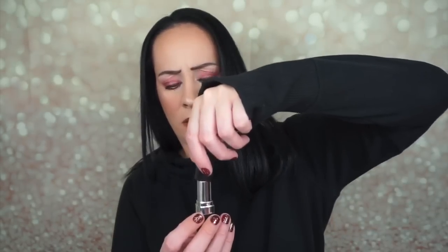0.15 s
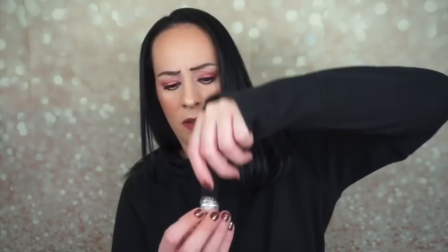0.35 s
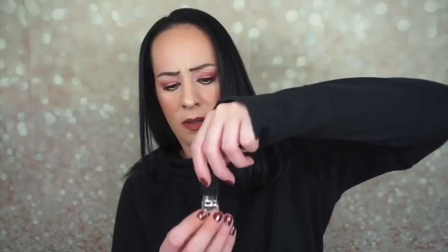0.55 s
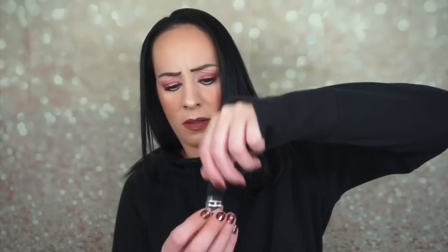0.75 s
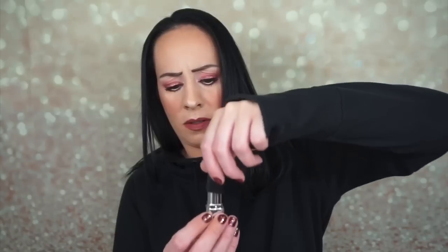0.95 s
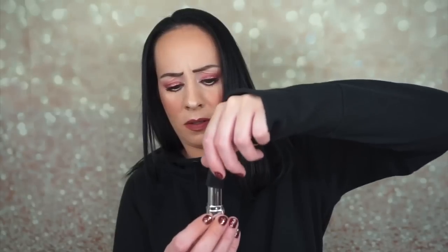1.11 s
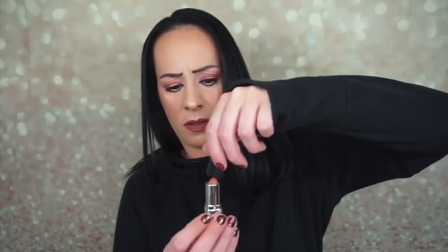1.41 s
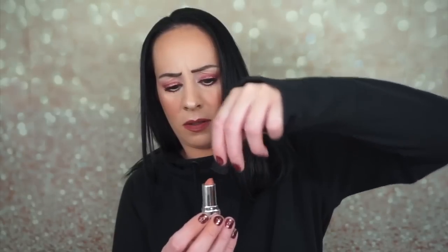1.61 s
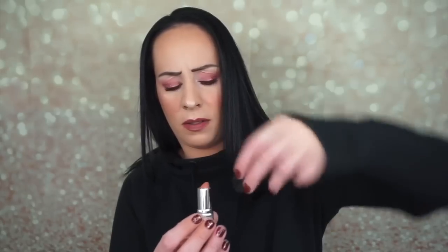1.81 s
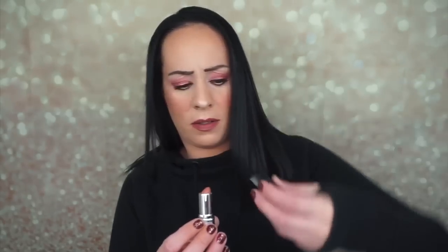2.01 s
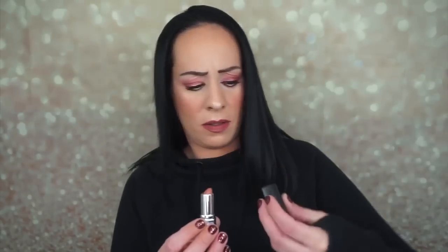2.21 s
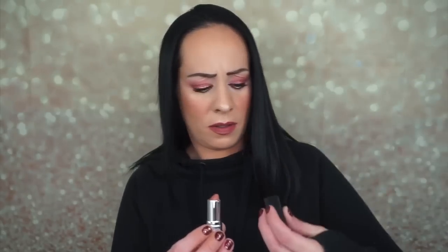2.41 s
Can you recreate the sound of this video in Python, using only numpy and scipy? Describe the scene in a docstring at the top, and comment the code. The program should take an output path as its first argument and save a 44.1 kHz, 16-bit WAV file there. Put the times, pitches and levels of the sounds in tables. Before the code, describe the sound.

Close up in a small room, a cap ticks and scrapes along a metal lipstick tube, then snaps free with a very short ring. It grazes the tube once more, leaving soft rustling and a quiet room hum.

```python
"""The cap of a metal lipstick tube is worked off by fingers, close by in a small room.
It sticks and slips along the sleeve in dry ticks, knocks hollowly, snaps free with a short
metallic ring and grazes the tube once more. Each contact is a bright crack plus a few fading tones.
Hands and clothing rustle faintly over the low hum of the room."""
import sys
import numpy as np
from scipy import signal
from scipy.fft import rfft, irfft
from scipy.io import wavfile

SR = 44100
rng = np.random.default_rng(int(sys.argv[2]) if len(sys.argv) > 2 else 0)


def transcribe(u):
    """Save the signal u as a 16-bit wav file named by the first command-line argument.

    u: samples, shape (n,) or (channels, n), limited to [-1, 1]; the rate is SR.
    q: integer samples, one column per channel.
    """
    v = np.clip(np.atleast_2d(u).T, -1, 1)
    q = np.round(v * 32767).astype(np.int16)
    wavfile.write(sys.argv[1], SR, q)


N = 112454
TIME = np.arange(N) / SR
RING_TIME = TIME[:8192]

# steady air of the room: f/Hz, level/dB
AIR_SPECTRUM = [(12, -13.5), (22, -10.5), (36, 1), (60, -10.5), (100, -14.5), (135, -7.5), (180, -11.5),
                (260, -10.5), (295, -17.5), (345, -12.5), (415, -10.5), (455, -22.5), (520, -22),
                (650, -27), (1000, -25), (2300, -34), (5000, -37.5), (11000, -38)]
# hums of the room: f/Hz, half width/Hz, level/dB
ROOM_HUMS = [(134, 17.4, -66.5), (366.6, 6.5, -59), (421.7, 9.5, -69), (485, 4.3, -72)]
# how alike the noise is in both ears: f/Hz, likeness (1 = the same)
EAR_LIKENESS = [(30, 1), (90, 0.98), (180, 0.89), (350, 0.84), (700, 0.25), (2000, 0.15), (10000, 0.12)]
# hand and clothing move: t/s, level/dB
RUSTLE_LEVELS = [(0, -54.5), (.08, -56), (.19, -57), (.34, -48), (.43, -54), (.7, -55), (1.15, -69),
                 (1.45, -63), (1.75, -65.5), (2.06, -63.5), (2.17, -72.5), (2.55, -62)]
# colour of the rustle: f/Hz, level/dB
RUSTLE_COLOUR = [(100, -13.5), (300, -3), (480, 6), (700, -3.5), (1200, -12), (2000, -19), (4000, -27.5),
                 (11000, -44.5)]
# soft bumps of the arm: t/s, level/dB, half length/s
ARM_BUMPS = [(0.129, -47.5, .06), (0.47, -55.5, 0.14), (2.264, -49.5, 0.049), (2.388, -53, 0.086)]
# colour of the bumps: f/Hz, level/dB
BUMP_COLOUR = [(20, 5), (36, 5), (70, -2), (135, -1.5), (250, -10.5), (600, -52.5)]
# the cap knocks on the tube: t/s, level/dB, crack level/dB, rasp length/s
CAP_KNOCKS = [(0.057, -36.5, -16, 0.012), (0.629, -12.5, -11.5, 0.0011), (0.7415, -3.5, -5.5, .004)]
# tones of the hollow cap: f/Hz, level/dB, t60/s (the time to fade by 60 dB)
CAP_TONES = [(717, -5.5, 0.024), (820, -7.5, .012), (1085, -12, 0.0096), (1574, -12, 0.026),
             (1942, -2.5, 0.013), (2160, -4, .011), (2460, -9, 0.0095), (2850, -7, 0.0086),
             (3620, -12.5, 0.0091)]
# the cap rubs along the sleeve: t/s, level/dB
RUB_LEVELS = [(0, -93), (.2, -67), (.27, -63), (.34, -58), (.39, -62), (.56, -62), (.67, -49), (.73, -54.5),
              (.79, -43.5), (.85, -56), (.95, -72)]
# colour of the rubbing: f/Hz, level/dB
RUB_COLOUR = [(500, -22.5), (2200, -6), (2900, -10.5), (4800, -6.5), (7000, -5), (8800, -4), (11000, -9)]
# the cap slips: t/s, level/dB, body boost/dB, mid boost/dB, top boost/dB, rasp length/s, pitch factor
SLIP_TICKS = [(0.149, -53.5, -8, -9, 9, .001, 0.95), (0.2212, -23.5, 7, 0.5, 7, .002, 1.01),
              (0.2753, -35.5, -24, 1, 8, .003, 1.11), (.3080, -27.5, 1, 2, 7.5, 0.0013, 1),
              (0.3357, -27.5, 1, 2.5, 3.5, 0.00072, 1.15), (0.3487, -24.5, 2, -8, -1.5, 0.00097, 1.01),
              (0.3725, -29, 4, 0, 3, .002, 1.14), (0.3922, -29.5, 6, 3, -5, .001, 0.97),
              (0.44, -19.5, -1, -4, -2, 0.0017, 0.99), (0.443, -21, 5.5, -3.5, 0.5, .003, 1.015),
              (0.4778, -29.5, -7, -5, 0.5, 0.0009, 1.02), (0.5262, -20, 3, 7.5, 2, 0.0014, 1.04),
              (0.5948, -23.5, 6, -5, -0.5, 0.0011, 1), (0.605, -31.5, 10, -14, 4.5, .003, 0.82),
              (0.6304, -31, -7, -5, 2, 0.0014, 1.05), (0.656, -22.5, 2, -6, -9, 0.0035, 1.01),
              (0.6733, -33, 3, -2, 2, 0.0021, 1), (0.68, -45, 4, -6, 8.5, 0.0022, 1),
              (0.7036, -24.5, 11, -5, 5.5, .002, 1.03), (0.8023, -36.5, 24, 4, 13, .003, 1.07),
              (.8059, -14.5, 9.5, -18, 0.5, 0.00202, 1.026), (0.8387, -39, -8, 8.5, 9.5, 0.0011, 0.99),
              (.9062, -68, 4.5, 4, 3, .002, 1), (1.0100, -41, 11, 7.5, 2, .004, 1.03)]
# tones of the held sleeve, before each tick shifts them: f/Hz, level/dB, t60/s
SLEEVE_TONES = [(990, -15.5, 0.0083), (1740, -15, 0.0058), (2848, -6, 0.021), (3130, -7, 0.018),
                (3790, -9.5, 0.0063), (4620, -10.5, 0.024), (5700, -33, 0.0069), (6360, -3, 0.03),
                (7040, -4, 0.042), (7575, -1, 0.0085), (7800, -19, 0.0063), (9270, -7, 0.0027),
                (10160, 5.5, 0.0034), (10700, 4, 0.013)]
# the cap snaps free: t/s, level/dB, rasp length/s
RELEASE_SNAPS = [(0.7469, -12.5, 0.0016), (0.7502, -5, 0.0012), (0.76, -19.5, 0.0015)]
# tones of the freed tube: f/Hz, level/dB, t60/s
TUBE_TONES = [(3176, -8, 0.032), (3608, -6, 0.031), (4020, -10.5, .03), (4570, -21, 0.049),
              (6890, 4.5, 0.033), (7120, 1, .04), (7480, -3.5, 0.0187), (8450, -4.5, 0.014),
              (8750, -11.5, 0.011), (9500, -6, 0.016), (10100, -25, .022)]
# echoes off nearby surfaces: delay/s, left level/dB, right level/dB
CLOSE_ECHOES = [(.0021, -10.5, -13.5), (.0036, -24, -11.5), (.0088, -16, -8)]
# colour of the room's fading echo: f/Hz, level/dB
TAIL_SPECTRUM = [(500, 4.5), (2000, 0.5), (4000, -1), (7000, -5), (11000, -4), (20000, -5.5)]

CRACK_S, BRIGHT_CRACK_HZ, CUTOFF_HZ = .0004, 6380, 11100
NEAR_DELAY_S, NEAR_T60_S = .0016, .0566


def from_db(db):
    """Turn decibels into a gain."""
    return 10 ** (np.asarray(db) / 20)


def unit_energy(x):
    """Scale each channel to an energy of 1."""
    return x / np.sqrt(np.sum(x ** 2, axis=-1, keepdims=True) + 1e-20)


def pan(db):
    """Left and right gains; below 0 dB the right is louder."""
    return from_db(np.array([[db], [-db]]) / 2)


def add(out, start_s, sound):
    """Mix a stereo sound in at a given time."""
    start = int(start_s * SR)
    out[:, start:start + sound.shape[1]] += sound[:, :N - start]


def at_hz(points, hz):
    """Read a table between its rows, on a log-frequency scale."""
    known_hz, values = np.transpose(points)
    return np.interp(np.log(hz + 1), np.log(known_hz), values)


def stereo_noise(likeness, size=N):
    """White noise, partly shared by both ears."""
    mid, side = rfft(rng.standard_normal((2, size)))
    return irfft(np.sqrt(1 + likeness) * mid + np.sqrt(1 - likeness) * side * [[1], [-1]], size)


def coloured_noise(spectrum):
    """Shaped noise with an average power of 1, wider towards the treble."""
    hz = np.fft.rfftfreq(N, 1 / SR)
    shaped = rfft(stereo_noise(at_hz(EAR_LIKENESS, hz))) * from_db(at_hz(spectrum, hz))
    return unit_energy(irfft(shaped, N)) * np.sqrt(N)


def level_curve(rows):
    """Join (time, level) points into a gain over time."""
    return from_db(np.interp(TIME, *np.transpose(rows)))


def fade(t, t60):
    """Fall by 60 dB every t60 seconds."""
    return np.exp(-np.log(1000) * t / t60)


def boost(x, hz, db):
    """Lift a broad band around hz, or cut it if db is negative."""
    band = signal.lfilter(*signal.iirpeak(hz, Q=2.94, fs=SR), x)
    return x + (from_db(db) - 1) * band


def evened(burst, start_s, end_s):
    """Even out the colour of a noise burst and keep it between two times."""
    for _ in range(4):
        spectrum = rfft(burst)
        flat = irfft(spectrum / (np.abs(spectrum) + 1e-9))
        burst = flat * (RING_TIME >= start_s) * (RING_TIME < end_s)
    return unit_energy(burst)


def ring(tones, spread_db=1):
    """A struck object rings with its own fading tones, a little differently each time."""
    sound = np.zeros(len(RING_TIME))
    for k, (hz, db, t60) in enumerate(tones):
        strength = from_db(db + spread_db * rng.standard_normal())
        tone = np.sin(2 * np.pi * hz * RING_TIME) * fade(RING_TIME, t60)
        sound += (-1) ** k * strength * unit_energy(tone)
    return sound


def crack(low_hz):
    """The first instant of a hard contact: a tiny burst of noise above low_hz."""
    burst = rng.standard_normal(len(RING_TIME)) * np.exp(-(RING_TIME / CRACK_S) ** 2)
    band = signal.butter(2, [low_hz, CUTOFF_HZ], "band", fs=SR, output="sos")
    return unit_energy(signal.sosfilt(band, evened(burst, 0, 2 * CRACK_S)))


def rasped(sound, length_s, count=16, slips_db=-4.5):
    """Tiny slips after a contact sound the object again; the total energy stays the same."""
    slips = np.zeros(len(RING_TIME))
    when, size = rng.random(count), rng.standard_normal(count)
    np.add.at(slips, (when * length_s * SR).astype(int) + 1, unit_energy(size) * from_db(slips_db))
    slips[0] = 1   # the contact itself
    return unit_energy(signal.fftconvolve(sound, slips)[:len(sound)]) * np.linalg.norm(sound)


def nearby(sound, cluster_db=.5):
    """Add close echoes and a quick cluster of reflections, new each time as the hands move."""
    cluster = stereo_noise(likeness=.077, size=len(RING_TIME))
    cluster *= (RING_TIME > NEAR_DELAY_S) * fade(RING_TIME, NEAR_T60_S)
    paths = pan(db=-1) * from_db(cluster_db) * evened(cluster, NEAR_DELAY_S, NEAR_T60_S)
    paths[:, 0] += 1   # the direct sound
    for delay_s, left_db, right_db in CLOSE_ECHOES:
        paths[:, int(delay_s * SR)] += from_db([left_db, right_db])
    return signal.fftconvolve(sound[None], paths, axes=1)


def room_hum(air_db=-51):
    """Steady air noise, plus narrow bands of noise heard as wavering hums."""
    hz = np.fft.rfftfreq(N, 1 / SR)
    noise = rfft(stereo_noise(at_hz(EAR_LIKENESS, hz)))
    hums = np.zeros((2, N))
    for hum_hz, half_width_hz, db in ROOM_HUMS:
        band = noise / (1 + ((hz - hum_hz) / half_width_hz) ** 2)
        hums += from_db(db) * unit_energy(irfft(band, N))
    return from_db(air_db) * coloured_noise(AIR_SPECTRUM) + hums * np.sqrt(N)


def clothing_rustle():
    """Soft noise swells and sinks as hand and clothing move."""
    return level_curve(RUSTLE_LEVELS) * coloured_noise(RUSTLE_COLOUR)


def arm_bumps():
    """Each bump of the arm is a smooth swell of deep noise."""
    swells = sum(from_db(db) * np.exp(-((TIME - s) / half_s) ** 2) for s, db, half_s in ARM_BUMPS)
    return swells * coloured_noise(BUMP_COLOUR)


def cap_knocks():
    """The hollow cap hits the tube and rings briefly, duller than the ticks."""
    out = np.zeros((2, N))
    for start_s, db, crack_db, rasp_s in CAP_KNOCKS:
        knock = ring(CAP_TONES) + from_db(crack_db) * crack(low_hz=1300)
        add(out, start_s, from_db(db) * nearby(rasped(knock, rasp_s)))
    return out


def cap_rubbing():
    """The cap hisses faintly as it rubs along the sleeve."""
    return level_curve(RUB_LEVELS) * coloured_noise(RUB_COLOUR)


def sleeve_ticks(crack_db=7):
    """The cap sticks and slips; where it touches sets the pitch and colour of each tick."""
    out = np.zeros((2, N))
    for start_s, db, body_db, mid_db, top_db, rasp_s, pitch in SLIP_TICKS:
        tones = [(hz * pitch, tone_db, t60) for hz, tone_db, t60 in SLEEVE_TONES]
        tick = ring(tones) + from_db(crack_db) * crack(BRIGHT_CRACK_HZ)
        tick = boost(tick, hz=2280, db=body_db)
        tick = boost(tick, hz=4830, db=mid_db)
        tick = boost(tick, hz=11100, db=top_db)
        add(out, start_s, from_db(db) * nearby(rasped(tick, rasp_s)))
    return out


def tube_snaps(crack_db=2):
    """The cap clears its catch and the freed tube rings."""
    out = np.zeros((2, N))
    for start_s, db, rasp_s in RELEASE_SNAPS:
        snap = ring(TUBE_TONES) + from_db(crack_db) * crack(BRIGHT_CRACK_HZ)
        add(out, start_s, from_db(db) * nearby(rasped(snap, rasp_s)))
    return out


def room_echo(x, tail_db=-15, t60_s=.44):
    """The room adds a faint, duller tail to a sound."""
    colour = from_db(at_hz(TAIL_SPECTRUM, np.fft.rfftfreq(N, 1 / SR)))
    wash = irfft(rfft(stereo_noise(likeness=.064)) * colour, N)
    tail = from_db(tail_db) * unit_energy(wash * (TIME > NEAR_DELAY_S) * fade(TIME, t60_s))
    return x + signal.fftconvolve(x, tail, axes=1)[:, :N]


def scene():
    """The lipstick echoes in the room, over quiet handling noise and hum."""
    lipstick = sleeve_ticks() + tube_snaps() + pan(db=-1) * cap_knocks()
    return room_echo(lipstick) + cap_rubbing() + clothing_rustle() + arm_bumps() + room_hum()


def record(dry):
    """Cut the highest treble steeply."""
    return signal.sosfilt(signal.ellip(10, .2, 70, CUTOFF_HZ, fs=SR, output="sos"), dry)


dry = scene()
out = record(dry)
transcribe(out)
```